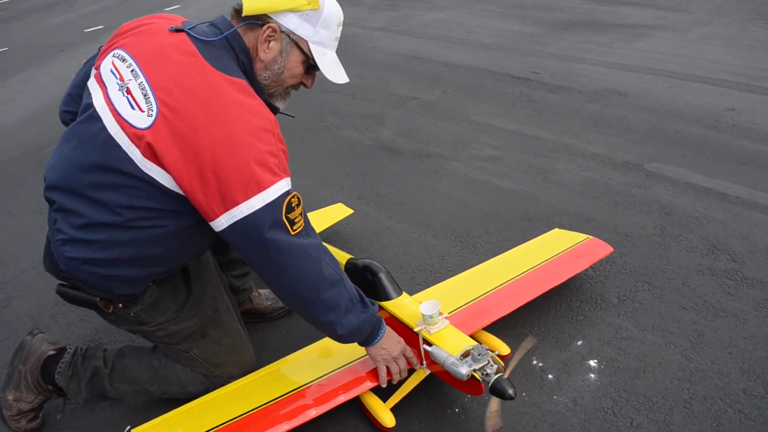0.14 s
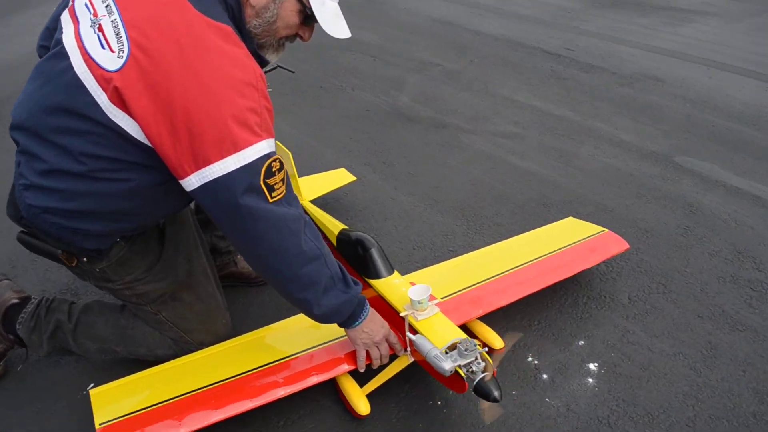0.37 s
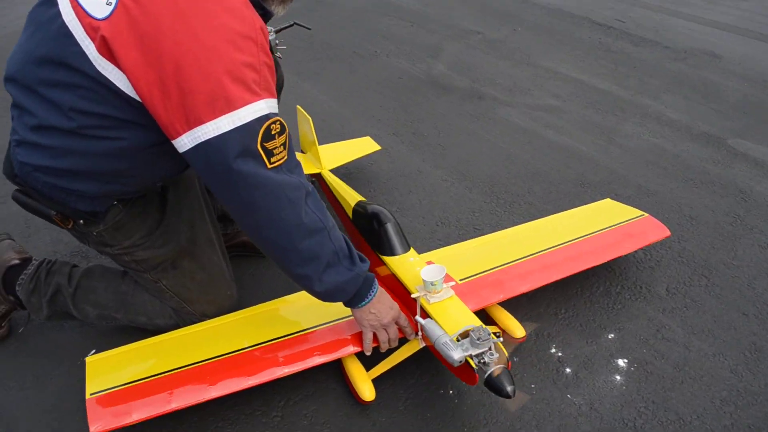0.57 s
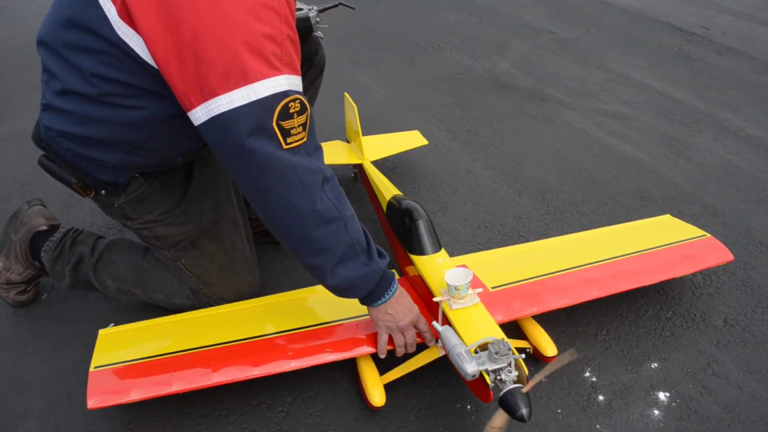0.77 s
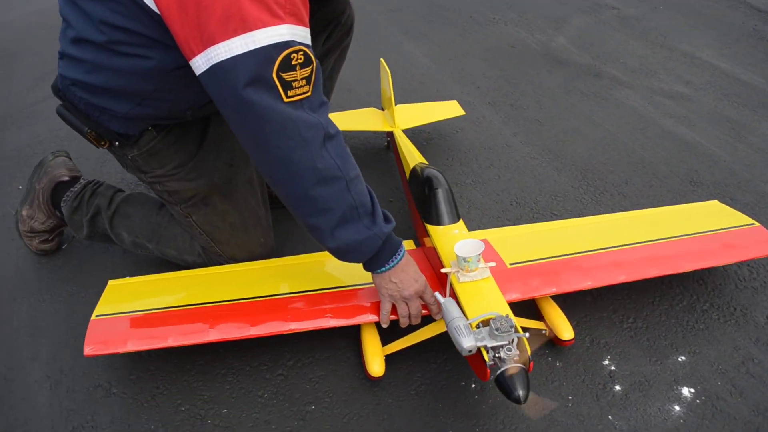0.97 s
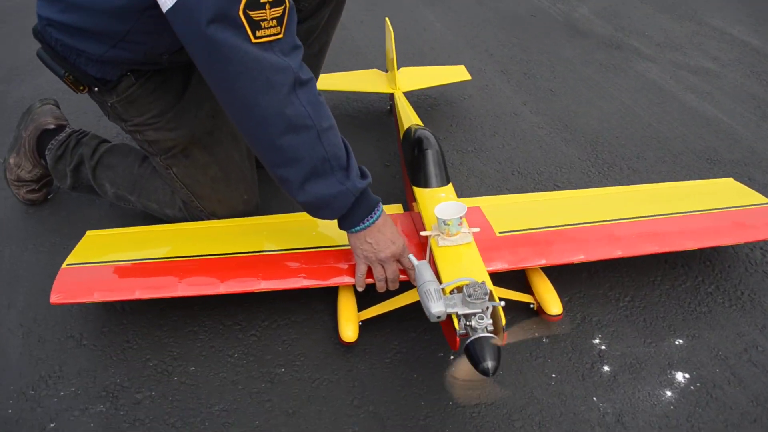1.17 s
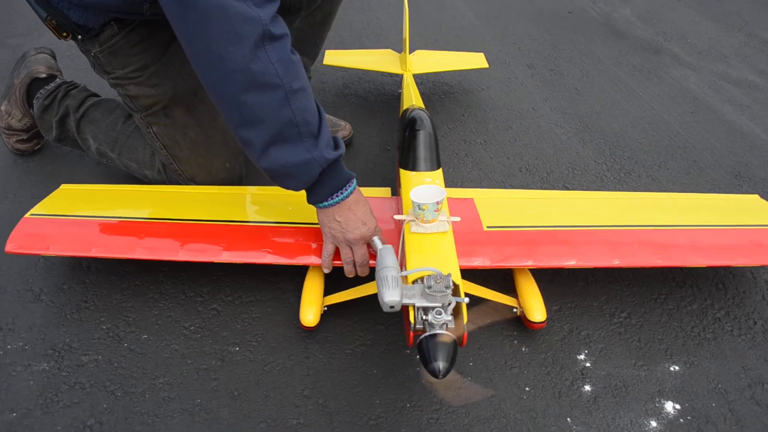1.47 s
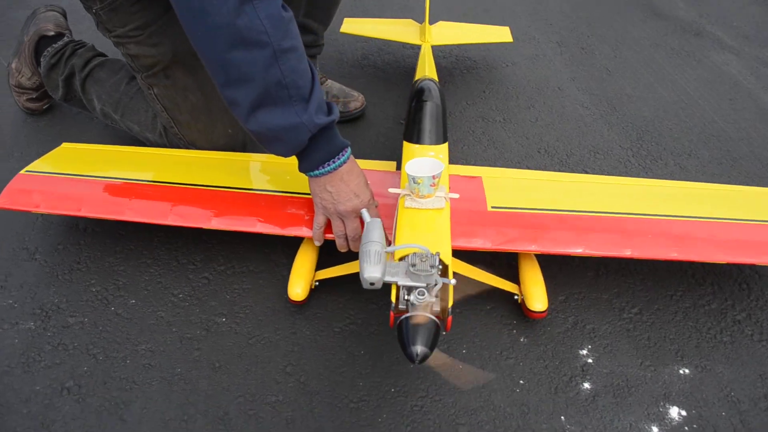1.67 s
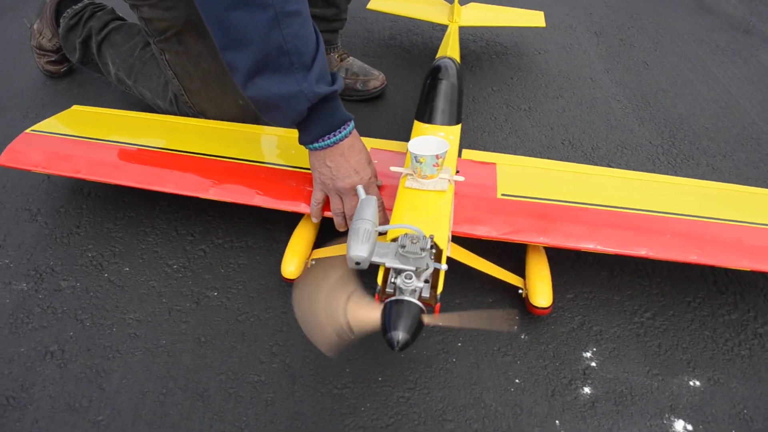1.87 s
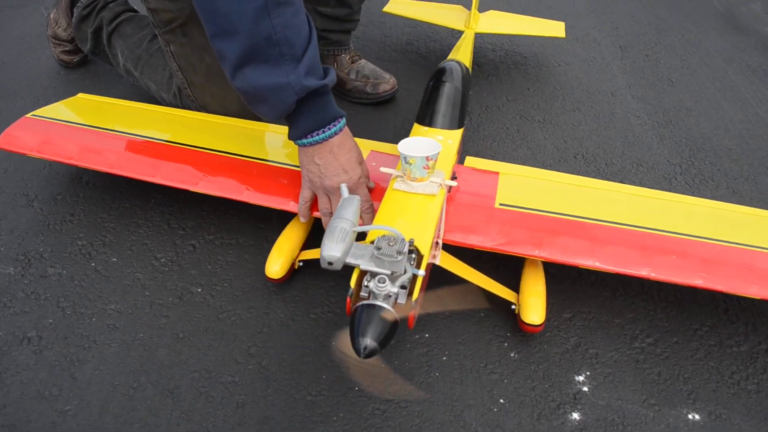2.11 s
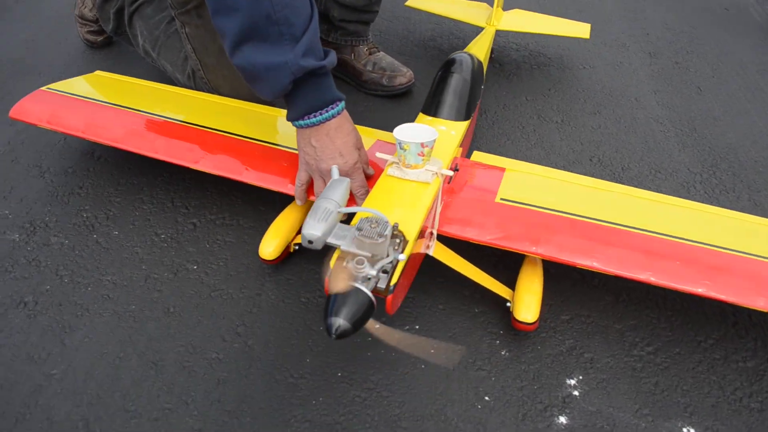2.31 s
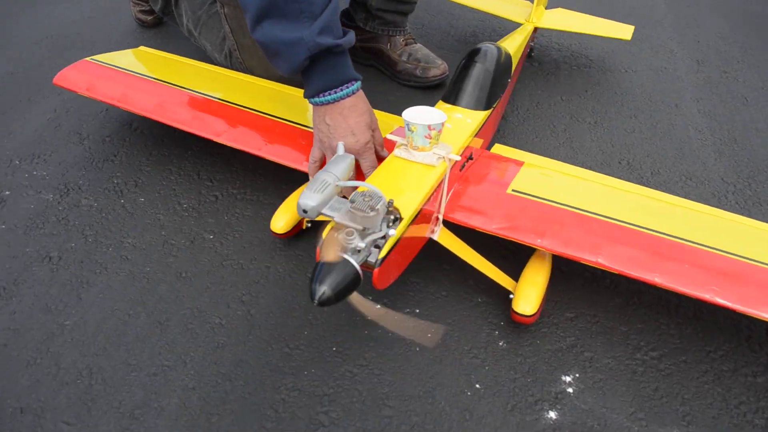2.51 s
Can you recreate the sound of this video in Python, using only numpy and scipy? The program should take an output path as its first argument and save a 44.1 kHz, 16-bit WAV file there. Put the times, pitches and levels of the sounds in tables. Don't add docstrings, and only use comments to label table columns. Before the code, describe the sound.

Rapid popping idle of a model plane engine, briefly revving, with wind gusts overloading the microphone.

```python
import sys
import numpy as np
from scipy import signal
from scipy.io import wavfile
from scipy.ndimage import uniform_filter1d

SR = 44100
rng = np.random.default_rng(int(sys.argv[2]) if len(sys.argv) > 2 else 0)


def rack_gain(trim_db):
    fader = np.asarray(trim_db, float)
    return 10 ** (fader / 20)


def to_wav(sig):
    pcm = np.clip(np.atleast_2d(sig), -1, 1) * 32767
    pcm = np.round(pcm).astype(np.int16)
    wavfile.write(sys.argv[1], SR, pcm.T)


N = 116865

# start_s, rumble_db, buffet_db
WIND_STRENGTH = [(0, -26.5, -14.5), (.2, -21.5, -15.5), (.42, -27.5, -14.5), (.57, -18.5, -15.5),
                 (.7, -51, -11.5), (.76, -29.5, -22), (.9, -19, -24.5), (1.0, -23.5, -39),
                 (1.13, -28.5, -29.5), (1.23, -15, -26.5), (1.31, -22.5, -21), (1.41, -25.5, -19.5),
                 (1.5, -20.5, -29), (1.65, -23.5, -30), (1.78, -31, -35), (1.86, -26.5, -32),
                 (2.22, -32.5, -33.5), (2.65, -30.5, -30)]
# pitch_hz, level_db per Hz
RUMBLE_COLOUR = [(20, -37.5), (42, -6), (70, 1.5), (120, 1), (200, -1), (350, -26), (1000, -46)]
# pitch_hz, level_db per Hz
BUFFET_COLOUR = [(35, -28), (110, 3.5), (185, 12.5), (300, 7.5), (480, 6), (852, -8), (1250, -19.5),
                 (2770, -67.5), (5200, -87)]
# pitch_hz, level_db per Hz
GUST_COLOUR = [(150, -38.5), (250, 1), (563, -6.5), (678, -0.5), (855, -12), (1200, -10.5), (4000, -69),
               (5200, -74.5), (8800, -120)]
# start_s, length_s, level_db
BRIGHT_GUSTS = [
    (0, 0.052, -18),
    (0.143, 0.028, -21.5),
    (0.212, 0.038, -18),
    (0.306, 0.013, -17.5),
    (0.431, 0.0565, -15.5),
    (0.479, 0.064, -18),
    (0.614, 0.0073, -16.5),
    (0.68, 0.018, -20),
    (1.286, 0.034, -18.5),
    (1.342, 0.0575, -20.5),
]
# middle_s, level_db,
# pitch_hz
SHORT_FLAPS = [(.003, -19.5, 1500), (.0297, -18.5, 1700), (.0541, -23.5, 1400), (.0884, -19.5, 1300),
               (.1182, -24, 1390), (.1534, -16, 1580), (.1683, -25.5, 2000), (.1914, -20.5, 1500),
               (.2159, -14.5, 1400), (.2272, -19, 1500), (.234, -24, 1510), (.2412, -18.5, 1880),
               (.2567, -24, 1390), (.2966, -17.5, 1480), (.3054, -23, 1910), (.4371, -18.5, 1630),
               (.4542, -19, 1840), (.4736, -27, 1530), (.4971, -22, 1580), (.5058, -24, 1500),
               (.5131, -25, 1700), (.523, -27, 1670), (.5381, -33, 1530), (.6681, -43, 2500),
               (.6922, -25.5, 1720), (.6125, -3, 690), (.482, -17, 900), (1.2895, -3, 950), (1.311, -13, 650),
               (1.3545, -5, 845), (1.397, -15, 734)]
# middle_s, level_db, pitch_hz
AIR_PUFFS = [(1.02, -16.5, 70), (.76, -11, 163), (2.22, -22, 75), (.105, -6.5, 172), (.21, -5, 192),
             (.375, -5, 412), (1.15, -16.5, 413), (.76, -10, 414), (.787, -13.5, 380), (.815, -10, 320),
             (1.034, -17.5, 145), (1.275, -12.5, 205), (1.301, -6, 306), (1.339, -3.5, 384),
             (1.38, -7.5, 190), (1.42, -23, 173), (1.843, -12.5, 162), (1.885, -24, 126), (1.906, -23, 157),
             (2.225, -21.5, 127)]
# middle_s, height (full scale 1), width_s
AIR_SLAPS = [(.0025, 0.37, 0.00044), (0.669, -.2, 0.00095), (0.2157, 0.19, 0.00035),
             (0.2406, -0.14, 0.00045), (0.3755, 0.35, 0.00052), (0.456, 0.2, 0.00043),
             (0.565, -0.24, 0.00062), (0.613, 0.46, 0.00075), (0.7107, -0.18, 0.00026),
             (0.4798, -0.18, 0.00051), (0.4955, 0.096, 0.00045)]
# middle_s, height (full scale 1), width_s
BIGGEST_SLAP = (1.3092, .95, .0004)
# time_s, speed_turns_per_s
CRANK_SPEED = [(0.0, 43.64), (0.45, 42.97), (0.78, 41.48), (0.92, 44.8), (1.0, 47.43), (1.07, 57.95),
               (1.15, 68.76), (1.24, 74.29), (1.33, 64.96), (1.45, 62.12), (1.56, 55.01), (1.68, 48.84),
               (1.8, 45.99), (1.95, 46.09), (2.1, 45.01), (2.3, 46.61), (2.45, 47.37), (2.65, 48.64)]
# time_s, level_db
OPENNESS = [(0, -74.5), (.4, -73), (.8, -77.5), (.95, -63.5), (1.04, -61.5), (1.1, -56.5), (1.2, -53),
            (1.3, -56), (1.315, -63.5), (1.4, -58), (1.6, -58.5), (2.0, -59), (2.65, -56.5)]
# pitch_hz, level_db per Hz
HISS_COLOUR = [(240, -78.5), (400, -5.5), (645, -2.5), (935, -7.5), (1330, -9), (4440, -28), (6050, -36.5),
               (12600, -41), (16000, -64.5)]
# time_s, change_db
UNEVEN_FIRINGS = [(.863, -5), (.886, -22), (.931, -10.5), (1.016, -16), (1.072, -10), (1.136, -7),
                  (1.165, -27), (1.248, -24), (1.32, -18), (1.335, -16), (1.366, -26), (1.413, -33),
                  (1.478, -26), (1.547, -8), (1.565, -5), (1.621, -30), (1.681, -5), (1.743, -12),
                  (1.786, -14), (1.829, -5), (1.851, -40), (2.003, -32), (2.179, -27), (2.266, -28),
                  (2.458, -6.5), (2.479, -26), (2.542, -34), (2.625, -32), (.792, -17), (.817, -3),
                  (.995, 0), (1.15, 0.5), (1.221, -5), (1.235, 0.5), (1.276, -8), (1.29, 0.5), (1.354, -28),
                  (1.397, -6), (1.43, -15), (1.462, -14), (1.512, -4), (1.583, -5), (1.701, -1),
                  (1.762, -6), (1.916, -1), (1.937, -14), (2.024, -9), (2.048, 0.5), (2.069, -16),
                  (2.091, -1.5), (2.114, 0), (2.223, -4), (2.645, -7.5)]
# pitch_hz, level_db, fade_s (to fall 60 dB)
MUFFLER_RING = [(193.6, -3, 0.22), (710, -2, 0.031), (1080, 9, 0.027)]
# pitch_hz, level_db, fade_s (to fall 60 dB)
TAILPIPE_RING = [(1405, 5.5, 0.019), (1654, -6, 0.026), (2440, -13, 0.031), (3126, -15, 0.025),
                 (3900, -23.5, 0.053)]
# start_s, ping_db
HARD_BEHIND = [(0.0433, -55), (0.0676, -52), (0.0917, -43), (0.1136, -71), (0.1603, -48), (0.205, -33),
               (0.2743, -37.5), (0.3212, -70), (0.3446, -37), (0.415, -46), (0.437, -45), (0.4853, -38),
               (0.528, -54), (0.6018, -36), (0.6244, -60), (0.6484, -52), (0.7447, -51), (0.7677, -40),
               (0.8395, -36), (0.9083, -32), (0.9308, -41), (0.9527, -34), (0.9747, -36), (0.9951, -32),
               (1.035, -28), (1.053, -28), (1.087, -30), (1.1044, -37)]
# start_s, ping_db
HARD_FRONT = [(1.1914, -60), (1.2334, -30), (1.2877, -32.5), (1.4446, -49), (1.494, -57), (1.601, -50),
              (1.6594, -29), (1.7214, -33), (1.807, -26.5), (1.8721, -40), (1.8957, -32), (1.9808, -25.5),
              (2.048, -33), (2.1363, -41), (2.1583, -32), (2.1999, -31), (2.2228, -62), (2.2443, -26.5),
              (2.288, -34), (2.3306, -30.5), (2.371, -66), (2.4373, -21.5), (2.5, -31), (2.5207, -31),
              (2.5616, -63), (2.583, -31), (2.6016, -34)]
# pitch_hz, level_db, fade_s (to fall 60 dB)
FIN_RING_BEHIND = [(7650, -4.5, 0.018), (10700, -18, 0.01), (11500, -14.5, 0.011), (4350, -6, 0.0072)]
# pitch_hz, level_db, fade_s (to fall 60 dB)
FIN_RING_FRONT = [(6730, -0.5, 0.041), (7570, 5, 0.016), (8300, -2, 0.02), (8240, -6, 0.0096),
                  (10800, -3, 0.025), (10100, 0, 0.013), (13600, -21, 0.0039)]


def evened(x):
    return x / np.sqrt(np.mean(x ** 2) + 1e-20)


def curve(table, axis=1):
    points = np.array(table)
    return np.interp(np.arange(N) / SR, points[:, 0], points[:, axis])


def openness_db():
    return curve(OPENNESS) + 56


def noise(colour, patchy_db, size):
    hz = np.fft.rfftfreq(size, 1 / SR)
    real, imaginary, patch = rng.standard_normal((N * 4 // size + 5, len(hz), 3)).T
    patch = uniform_filter1d(patch, size=5, axis=0)
    patch = evened(uniform_filter1d(patch, size=4, axis=1))
    colour_hz, colour_db = np.transpose(colour)
    level_db = np.interp(np.log(hz + 1), np.log(colour_hz), colour_db, right=-120)
    spectrum = (real + 1j * imaginary) * rack_gain(level_db[:, None] + patchy_db * patch)
    return evened(signal.istft(spectrum, nperseg=size, noverlap=size * 3 // 4)[1][:N])


def ring(modes, soft_s):
    t = np.arange(3000) / SR
    tones = sum(rack_gain(db - 60 * t / fade_s) * np.sin(2 * np.pi * hz * t) for hz, db, fade_s in modes)
    x = tones * (1 - np.exp(-t / soft_s)) ** 2
    return x / abs(x).max()


def train(times, sizes):
    out = np.zeros(N)
    out[np.clip((np.asarray(times) * SR).astype(int), 0, N - 1)] = sizes
    return out


def flaps(table, turns):
    out = np.zeros(N + 4000)
    for middle_s, db, hz in table:
        swing = np.arange(-2000, 2000) / SR * hz
        flap = np.cos(2 * np.pi * swing) * np.exp(-(swing / turns) ** 2)
        out[int(middle_s * SR):][:4000] += rack_gain(db) * flap
    return out[2000:N + 2000]


def bright_gusts(t):
    strength = 0
    for start_s, length_s, db in BRIGHT_GUSTS:
        nearest_edge_s = np.minimum(t - start_s, start_s + length_s - t)
        strength = strength + rack_gain(db) * np.clip(nearest_edge_s / 0.0021 + 1, 0, 1)
    roughness = uniform_filter1d(rng.standard_normal(N), size=90)
    grain = rack_gain(5 * evened(uniform_filter1d(roughness, size=60)))
    return strength * evened(grain * noise(GUST_COLOUR, 3.6, size=128))


def slaps_and_snap(t):
    out = np.zeros(N)
    for middle_s, height, width_s in AIR_SLAPS + [BIGGEST_SLAP]:
        away = abs(t - middle_s) / width_s
        out += height * np.exp(-away) * (1 - away / 2)
    snap_s, rise_s = 1.4233, .003
    return out + .36 * (t < snap_s) * np.exp(-abs(t - snap_s) / rise_s)


def wind():
    t = np.arange(N) / SR
    air = rack_gain(curve(WIND_STRENGTH)) * noise(RUMBLE_COLOUR, 1.5, size=2048)
    air = air + rack_gain(curve(WIND_STRENGTH, axis=2)) * noise(BUFFET_COLOUR, 3, size=512)
    air = air + bright_gusts(t)
    air = air + flaps(SHORT_FLAPS, .95) + flaps(AIR_PUFFS, 1.3)
    overload = .66
    air = air / (1 + abs(air / overload) ** 6) ** (1 / 6)
    return air * np.minimum(t / 0.00086, 1) + slaps_and_snap(t)


def hiss(turns):
    throb = 0.11
    beat = 1 - throb + throb * 3 * np.exp(-(turns % 1) / 0.88)
    air = noise(HISS_COLOUR, 2.67, size=256)
    shade_db = openness_db()
    body = signal.sosfiltfilt(signal.butter(2, 2500, fs=SR, output="sos"), air)
    db = -28 + 3.5 * np.log2(curve(CRANK_SPEED) / 46)
    return rack_gain(db) * beat * (rack_gain(0.67 * shade_db) * body + rack_gain(shade_db) * (air - body))


def firings(turns):
    at = np.flatnonzero(np.diff(np.floor(turns))) / SR
    db = -16.5 + .6 * rng.standard_normal(200)[:len(at)]
    for time_s, change_db in UNEVEN_FIRINGS:
        db[np.argmin(abs(at - time_s))] += change_db
    for time_s, ping_db in HARD_FRONT:
        db[np.argmin(abs(at - time_s))] += .08 * (ping_db + 40)
    duck_db = .8 * np.maximum(curve(WIND_STRENGTH, axis=2) + 19, 0)
    lead_s = .0012
    return train(at - lead_s, rack_gain(db) * 3) * rack_gain(.33 * openness_db() - duck_db)


def exhaust(turns):
    t, blow_s = np.arange(2000) / SR, .0007
    fire = firings(turns)
    rattle_s, rattle_wait_s = 0.0076, 0.003
    fade = np.exp(-t / rattle_s) * (t > rattle_wait_s)
    rattle = signal.oaconvolve(fire, fade)[:N] * rng.standard_normal(N)
    drive = fire + rack_gain(-33) * rattle
    pipe = signal.oaconvolve(drive, ring(TAILPIPE_RING, blow_s))[:N]
    pipe = rack_gain(-13.5 + (1 - .33) * openness_db()) * pipe
    blast_hz, rise_s, open_s = 890, .0003, .0025
    blast = np.sin(2 * np.pi * blast_hz * t) * (1 - np.exp(-t / rise_s)) ** 2
    blast = blast * np.exp(-(t / open_s) ** 2)
    muffler = rack_gain(-14.5) * ring(MUFFLER_RING, blow_s)[:2000]
    return -signal.oaconvolve(drive, blast + muffler)[:N] - pipe


def flecks(turns):
    out = np.zeros(N + 3000)
    low_hz, high_hz, fade_s = 4350, 5100, 0.014
    starts = np.flatnonzero(np.diff(np.floor(turns - 0.74)))
    for at, (pitch_luck, size_luck) in zip(starts, rng.standard_normal((200, 2))):
        hz = low_hz + (high_hz - low_hz) * (.5 + .5 * np.tanh(pitch_luck))
        out[at:at + 3000] += rack_gain(-50 + 2.5 * size_luck) * ring([(hz, 0, fade_s)], 0.0037)
    return out[:N] * rack_gain(0.57 * openness_db())


def pings(knocks, fins, crack_db, detune):
    out, t = np.zeros(N + 3000), np.arange(3000) / SR
    band = signal.butter(3, (6000, 14700), "bandpass", fs=SR, output="sos")
    crack_s = 0.0081
    for start_s, ping_db in knocks:
        luck = rng.standard_normal((len(fins), 2))
        modes = []
        for (hz, db, fade_s), (pitch_luck, level_luck) in zip(fins, luck):
            modes.append((hz * (1 + detune * pitch_luck), db + 0.5 * level_luck, fade_s))
        tone = ring(modes, 0.000065)
        crack = signal.sosfilt(band, np.exp(-t / crack_s) * rng.standard_normal(3000))
        out[int(start_s * SR):][:3000] += rack_gain(ping_db) * (tone + rack_gain(crack_db) * crack)
    return out[:N]


def scene():
    turns = np.cumsum(curve(CRANK_SPEED)) / SR + .06
    air = wind()
    engine = hiss(turns) + exhaust(turns) + flecks(turns)
    engine = engine + rack_gain(-3) * pings(HARD_BEHIND, FIN_RING_BEHIND, crack_db=-18, detune=0.0069)
    engine = engine + rack_gain(-4) * pings(HARD_FRONT, FIN_RING_FRONT, crack_db=-15, detune=0.01)
    engine = signal.oaconvolve(engine, signal.firwin(255, 15800, fs=SR), "same")
    air = signal.oaconvolve(air, signal.firwin(255, 15700, fs=SR), "same")
    return (engine + air)[None]


def band_limit(x):
    return signal.sosfilt(signal.butter(12, 15900, fs=SR, output="sos"), x)


def record(dry):
    whine = rack_gain(-80) * np.sin(2 * np.pi * 15673 * np.arange(N) / SR)
    low_cut = signal.butter(2, 42, "highpass", fs=SR, output="sos")
    mix = signal.sosfilt(low_cut, dry) + whine
    return band_limit(mix)


dry = scene()
out = record(dry)
to_wav(out)
```